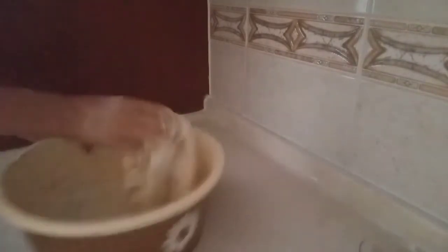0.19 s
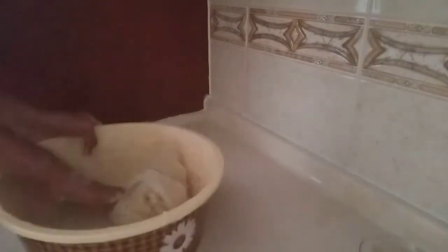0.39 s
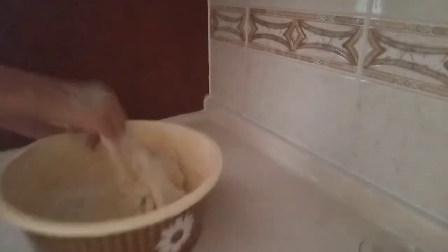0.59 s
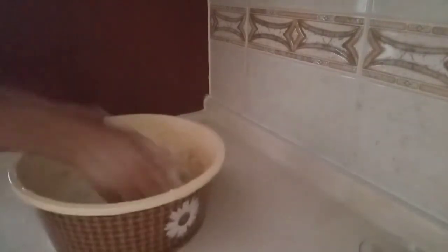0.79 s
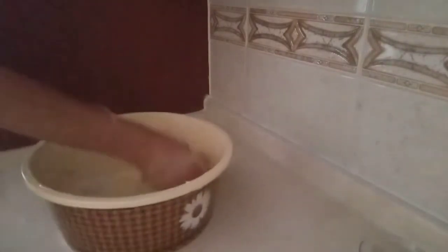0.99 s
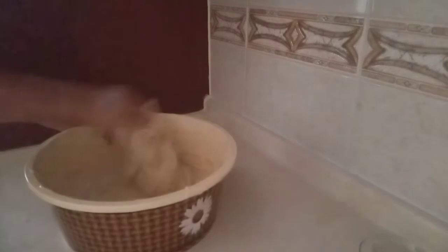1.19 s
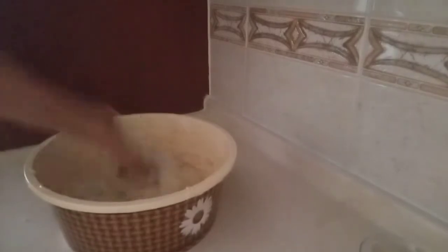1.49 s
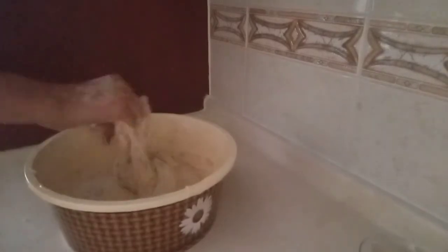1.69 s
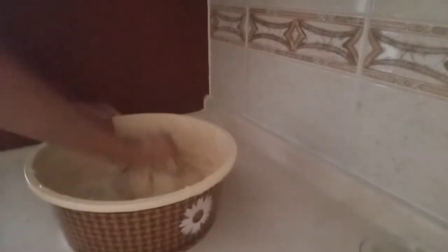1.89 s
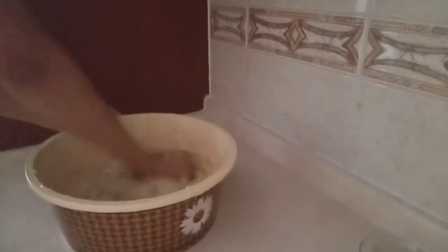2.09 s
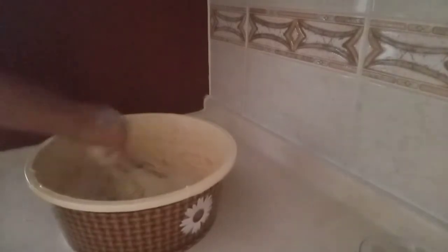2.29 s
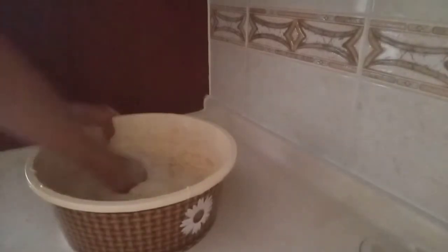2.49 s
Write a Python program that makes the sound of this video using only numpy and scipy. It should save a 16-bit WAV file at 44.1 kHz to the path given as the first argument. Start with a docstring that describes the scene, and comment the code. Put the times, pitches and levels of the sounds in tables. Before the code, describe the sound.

A hand kneads sticky dough in a plastic bowl. One hard wet slap briefly rings the bowl, then soft presses thump into the counter, with fine peeling crackles and light rubbing between them, heard close in a tiled kitchen.

```python
"""A hand kneads soft, sticky dough in a plastic bowl on the counter of a tiled kitchen.
One hard slap and several soft presses ring the bowl, and the presses thump into the counter.
Between them the dough peels off hand and plastic with a fine wet crackle, trapped air pops,
and the bowl rubs on the counter. The tiles add a short tail over a faint room tone."""
import sys
import numpy as np
from scipy import signal
from scipy.fft import rfft, irfft
from scipy.io import wavfile
from scipy.ndimage import uniform_filter1d

SR = 44100
rng = np.random.default_rng(int(sys.argv[2]) if len(sys.argv) > 2 else 0)


def to_wav(s):
    """Save 16-bit WAV."""
    ch = np.atleast_2d(s).T  # columns
    pcm = np.round(np.clip(ch, -1, 1) * 32767)  # PCM
    wavfile.write(sys.argv[1], SR, pcm.astype(np.int16))


N = 114660


def undb(db):
    return 10 ** (np.asarray(db) / 20)


def unit_rms(x):
    return x / np.sqrt(np.mean(x ** 2))


def unit_energy(x):
    return x / np.sqrt(np.sum(x ** 2) + 1e-18)


def through(x, response):
    """The sound filtered by an impulse response."""
    return signal.oaconvolve(x, response)[:N]


def on_log_axis(hz, points):
    """A curve of (frequency [Hz], value) points, read at the given frequencies."""
    point_hz, values = np.array(points, float).T
    return np.interp(np.log(np.maximum(hz, 1)), np.log(point_hz), values)


def colour(points, size=8192):
    """Minimum-phase impulse response of an EQ curve of (frequency [Hz], gain [dB]) points."""
    gain = undb(on_log_axis(np.fft.rfftfreq(size, 1 / SR), points))
    cepstrum = irfft(np.log(gain))
    cepstrum[1:size // 2] *= 2
    cepstrum[size // 2 + 1:] = 0
    return irfft(np.exp(rfft(cepstrum)))


def dull(x, hz):
    """Low-pass: a softer contact."""
    return signal.sosfilt(signal.butter(3, hz, fs=SR, output="sos"), x + 1e-18)


def place(x, at):
    """A short sound set at the given time."""
    return np.pad(x, (int(at * SR), max(N - len(x), 0)))[:N]


def click(at):
    """One impulse at the given time."""
    return place(np.ones(1), at)


def spray(decay, size=8192):
    """A dying spray of tiny contacts with an even spectrum, of unit energy."""
    fade = np.exp(-np.arange(size) / SR / decay)
    x = rng.standard_normal(size) * fade
    for _ in range(4):  # flatten the spectrum, then restore the fade
        x = irfft(np.exp(1j * np.angle(rfft(x))))
        power = uniform_filter1d(x ** 2, size=128).clip(0)
        x = x * fade / np.sqrt(power + 1e-12)
    return unit_energy(x)


def swell(peak, rise, fall, step=16):
    """Envelope: a smooth rise to a peak, then a decay."""
    age = np.arange(0, N, step) / SR - peak
    depth = np.where(age < 0, (age / rise) ** 2, age / fall)
    return np.repeat(np.exp(-np.minimum(depth, 50)), step)[:N]


def grains(per_s, spread_db=3):
    """Random clicks of uneven size, rms 1."""
    draws = np.random.default_rng(rng.integers(2 ** 31)).random((int(per_s * N / SR), 3))
    where, strength, polarity = draws.T
    size = undb(spread_db * np.minimum(-np.log(1 - strength), 6))
    return unit_rms(np.bincount((where * N).astype(int), size * np.sign(polarity - .5), N))


def room_tone(level_db=-68.5):
    """The still air of the kitchen: a faint, low hush."""
    # colour of the air (frequency [Hz], gain [dB])
    air_eq = [(25, -18), (60, -1.5), (100, 10), (170, -3), (400, -4.5), (1000, -14), (2000, -20.5),
              (3100, -17.5), (4500, -31), (6500, -37.5), (8700, -34), (11000, -37), (15500, -39)]
    return undb(level_db) * unit_rms(through(rng.standard_normal(N), colour(air_eq)))


def kitchen(x, tail_db=-2.5, build_s=.018, early_db=-8.5):
    """Quick reflections from bowl wall and tiles, then a short tail that loses its treble first."""
    # reverb decay by band (frequency [Hz], t60 [s])
    bands = [(100, .42), (400, .42), (1000, 0.41), (2500, 0.31), (5000, .3), (12000, .22)]
    t, hz = np.arange(SR) / SR, np.fft.rfftfreq(SR, 1 / SR)
    noise, tail = rfft(rng.standard_normal(SR)), 0
    for band_hz, t60 in bands:
        share = on_log_axis(hz, [(f, f == band_hz) for f, _ in bands])
        tail += irfft(noise * share) * np.exp(-np.log(1000) * t / t60)
    tail *= 1 - np.exp(-(t / build_s) ** 2)
    mid_t60 = bands[2][1]
    tail *= np.sqrt(2 * np.log(1000) / SR / mid_t60)  # offsets the energy a long decay gathers
    early = place(spray(decay=.017), at=.003)[:SR // 2]
    return undb(tail_db) * through(x, tail) + undb(early_db) * through(x, early)


def rubbing(width_hz=71, slips_per_s=900, trim_db=-1):
    """Bowl and hand rub in short jerks: in each, uneven slips excite one hollow resonance."""
    # jerks (peak time [s], rise [s], fall [s], resonance [Hz], relative level [dB])
    rubs = [(.602, .003, 0.025, 378, -42), (0.65, .002, 0.026, 640, -47), (.638, 0.011, 0.013, 390, -45),
            (.635, 0.026, .04, 800, -47.5), (0.65, 0.011, 0.033, 573, -47.5),
            (.738, 0.087, 0.023, 394, -51.5), (.765, .006, 0.0057, 410, -56),
            (.371, .008, 0.0064, 4150, -54), (1.296, 0.0037, 0.0088, 830, -47.5),
            (2.075, 0.0051, 0.023, 444, -43.5), (2.19, 0.034, 0.043, 495, -66)]
    out = 0
    for at, rise, fall, hz, db in rubs:
        b, a = signal.iirpeak(hz, hz / width_hz, fs=SR)
        tone = signal.lfilter(b, a, signal.lfilter(b, a, grains(slips_per_s)))
        out += undb(db + trim_db) * unit_rms(tone) * swell(at, rise, fall)
    return out


def pops():
    """Trapped air spits out of the dough."""
    # bursting air pockets (time [s], relative level [dB], decay [s])
    pockets = [(1.3872, -2, 0.0073), (1.392, -7, 0.0065)]
    # colour of a pop (frequency [Hz], gain [dB])
    pop_eq = [(200, -5), (800, 6), (1500, -10.5), (2100, -2), (3700, -0.5), (4700, -7), (5600, -16.5),
              (7200, -15), (8800, -11), (10500, -27), (15000, -47)]
    bursts = sum(undb(db) * place(spray(decay), at) for at, db, decay in pockets)
    return through(bursts, colour(pop_eq))


def bunches(per_s=89.54, scatter_db=1.4):
    """Uneven gain as the dough lets go patch by patch."""
    steps = rng.standard_normal(1024)
    flutter = np.interp(np.arange(N) / SR * per_s, np.arange(len(steps)), steps)
    return unit_rms(undb(scatter_db * flutter))


def peeling(threads_per_s=5000):
    """Thousands of sticky threads snap as the dough lets go: a wet crackle with a fine fizz on top."""
    # peels and smears (peak time [s], rise [s], fall [s], crackle level [dB], fizz level [dB])
    peels = [(.06, 0.17, 0.3, -54, -70.5), (.37, 0.0098, 0.0068, -39, -64.5),
             (.53, 0.043, 0.076, -61.5, -76), (0.671, 0.054, 0.05, -48.5, -68),
             (.735, 0.053, 0.013, -63, -73), (.834, 0.003, 0.025, -54, -98),
             (0.859, 0.013, 0.075, -55, -68), (.955, 0.046, .07, -46, -64.5),
             (1.10, 0.012, 0.079, -61.5, -91.5), (1.178, 0.016, 0.019, -68, -77),
             (1.269, 0.019, .02, -55.5, -84), (1.32, 0.026, 0.079, -52, -70.5),
             (1.51, 0.011, 0.033, -62, -66), (1.57, .02, .025, -65.5, -72),
             (1.914, 0.006, .02, -58.5, -64.5), (1.95, 0.023, 0.018, -54, -59.5),
             (1.993, 0.014, 0.017, -58, -96), (2.12, 0.07, 0.058, -64, -75.5),
             (2.159, 0.0086, 0.013, -62.5, -71.5), (2.21, 0.031, 0.12, -68.5, -84),
             (2.422, 0.018, 0.054, -61, -77), (2.52, 0.0027, .012, -81, -81),
             (2.60, 0.013, .02, -61.5, -82.5)]
    # colours of the crackle and the fizz (frequency [Hz], gain [dB])
    crackle_eq = [(50, -16), (120, -1.5), (250, -1), (550, 3), (1000, 1), (1600, -0.5), (2300, -4),
                  (3600, -9), (4700, -20), (6500, -30.5), (15000, -54.5)]
    fizz_eq = [(1000, -28.5), (3000, -1), (4500, 4.5), (5700, -5), (7000, -5.5), (8700, 4), (10500, -9.5),
               (12500, -6), (15500, -11)]
    patchiness = bunches()
    crackle_envelope = sum(undb(db) * swell(at, rise, fall) for at, rise, fall, db, _ in peels)
    fizz_envelope = sum(undb(db) * swell(at, rise, fall) for at, rise, fall, _, db in peels)
    crackle = through(crackle_envelope * grains(threads_per_s), unit_energy(colour(crackle_eq)))
    fizz = through(fizz_envelope * grains(threads_per_s), unit_energy(colour(fizz_eq)))
    return patchiness * (crackle + fizz)


def bowl(force):
    """The plastic bowl, loaded with dough, rings in its modes after every blow and push."""
    # bowl modes (frequency [Hz], gain at resonance [dB], t60 [s])
    modes = [(78, 3, .2), (111.7, 11, .33), (173.8, 12, 0.18), (413.2, 15, .3), (590, -1, 0.22),
             (717.5, 10.5, .24), (886, 9, .28), (925, 10, .22), (1126, 6.5, 0.48), (1392, 6.5, .33),
             (1646, 5, .32), (1730, 2.5, 0.18), (1979, 9, .33), (2292, 5, .28)]
    t = np.arange(SR) / SR
    response = 0
    for hz, db, t60 in modes:
        damping = np.log(1000) / t60
        response += undb(db) * 2 * damping / SR * np.exp(-damping * t) * np.cos(2 * np.pi * hz * t)
    return through(force, response)


def push(hz, spread, nudge_db=-5.5):
    """One padded contact: a nudge, and a smear as the dough gives way."""
    smear = spray(spread)
    return dull(smear + undb(nudge_db) * signal.unit_impulse(len(smear)), hz)


def presses(thump_db=-2.5):
    """Hand and dough lean on the bowl: dull pushes, and the low thumps they send into the counter."""
    # strokes (time [s], relative level [dB], low-pass [Hz], spread [s], thump offset [dB])
    strokes = [(0.039, -12, 700, 0.034, 10), (.355, 10, 1097, 0.011, 2.5), (.371, 6.5, 600, 0.0052, 6.5),
               (0.381, 9.5, 500, 0.0068, 9), (0.849, -18, 304, 0.0064, 20.5), (.875, 7.5, 530, 0.0028, 3.5),
               (.886, 4.5, 2415, 0.009, 7.5), (.940, -6.5, 900, 0.0091, 8.5), (1.272, -1.5, 500, 0.012, -1),
               (1.319, 1, 644, 0.045, 10.5), (1.360, 3.5, 825, 0.011, 10), (1.381, -1.5, 685, 0.015, 13),
               (1.432, -10.5, 915, 0.012, 19), (1.91, -18, 700, 0.0069, 7), (1.949, -12.5, 803, .015, 19.5),
               (1.997, -4.5, 700, 0.0082, 16), (2.070, 8.5, 500, 0.0025, 6.5),
               (2.135, -15, 547, 0.015, 15.5), (2.419, 0, 633, 0.0033, 5), (2.437, -9, 401, .004, 14),
               (2.576, 0.5, 607, 0.0045, 12)]
    # colours of a push and its thump (frequency [Hz], gain [dB])
    push_eq = [(40, -28.5), (100, -6), (185, 3), (280, -6.5), (420, -3.5), (620, -1.5), (1000, -8),
               (2000, -11), (4000, -13.5), (9000, -25)]
    thump_eq = [(25, -39.5), (48, -22), (70, -0.5), (110, 3.5), (170, -10), (260, -23), (600, -45.5),
                (3000, -78.5)]
    pushes = sum(place(undb(db) * push(hz, spread), at) for at, db, hz, spread, _ in strokes)
    weight = sum(undb(db + bass_db + thump_db) * click(at) for at, db, _, _, bass_db in strokes)
    return through(pushes, colour(push_eq)), through(weight, colour(thump_eq))


def slap(blow_s=.2265, blow_db=30):
    """The thrown lump flattens in stages: its wet smack, and the blow that rings the plastic."""
    # first contact, then the rest of the lump (time [s], relative level [dB], low-pass [Hz], spread [s])
    stages = [(0.2261, 25.5, 9000, 0.0076), (.2303, 23, 1392, 0.003), (.239, 26, 1500, 0.011),
              (.274, 16.5, 4190, .016)]
    # colour of the slap (frequency [Hz], gain [dB])
    slap_eq = [(30, -41), (70, -16), (110, -8.5), (180, -4), (280, -7), (480, -3), (850, 3), (1300, -7),
               (1800, -3.5), (2400, -6.5), (3000, -17.5), (4200, -27), (6300, -46), (8500, -37.5),
               (11000, -46.5), (15000, -46)]
    smack = sum(place(undb(db) * dull(spray(spread), hz), at) for at, db, hz, spread in stages)
    response = colour(slap_eq)
    return through(smack, response), through(undb(blow_db) * click(blow_s), response)


def scene(hand_damping_db=-7, send_db=-3):
    """The dough sounds, the ring they draw from the bowl, and the kitchen around them, in mono."""
    smack, blow = slap()
    pushes, thumps = presses()
    spits = pops()
    contact = smack + pushes + peeling() + rubbing()
    ring = bowl(blow + undb(hand_damping_db) * (pushes + thumps))  # less ring under a pressing hand
    reverb = kitchen(contact + undb(send_db) * (thumps + spits))
    return (contact + thumps + spits + ring + reverb + room_tone())[None]


def record(dry):
    """The microphone rounds the loudest peaks, and a steep low-pass cuts the very top."""
    rounded = dry / (1 + dry ** 8) ** (1 / 8)
    top_cut = signal.ellip(8, .2, 70, 15600, fs=SR, output="sos")
    return signal.sosfilt(top_cut, rounded)


dry = scene()
out = record(dry)
to_wav(out)
```